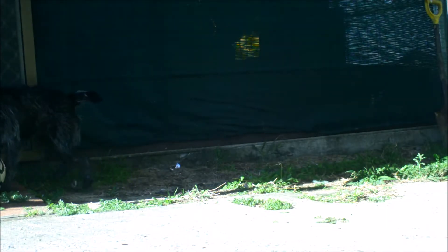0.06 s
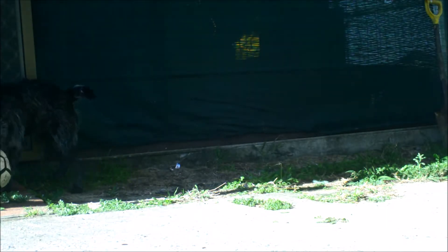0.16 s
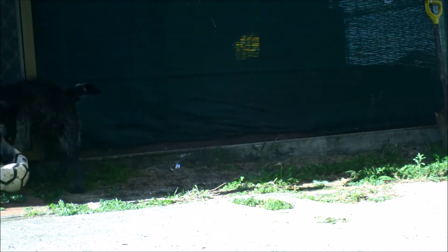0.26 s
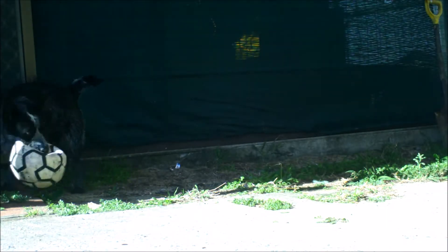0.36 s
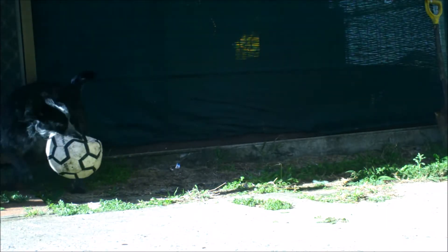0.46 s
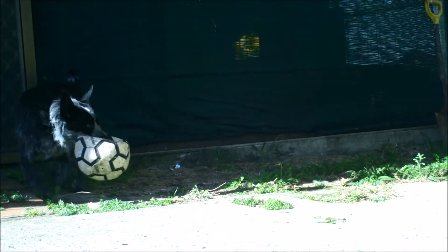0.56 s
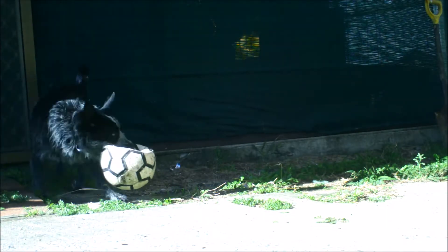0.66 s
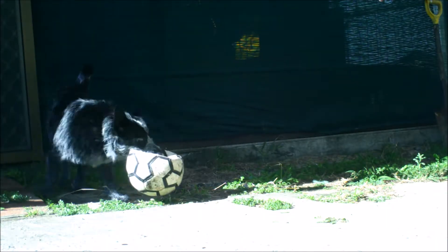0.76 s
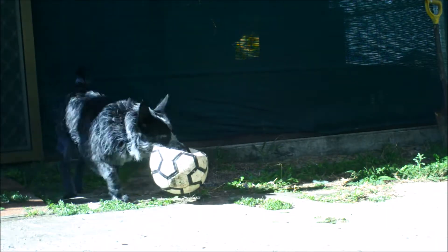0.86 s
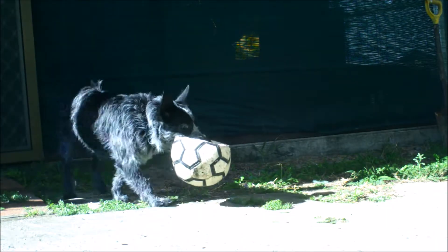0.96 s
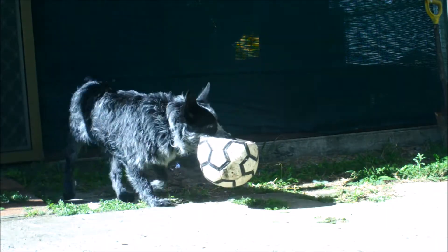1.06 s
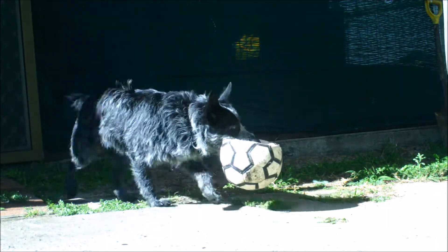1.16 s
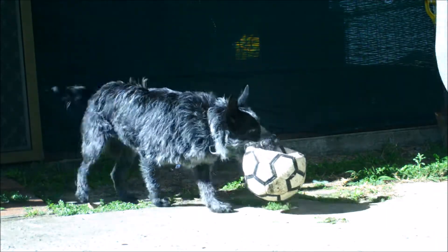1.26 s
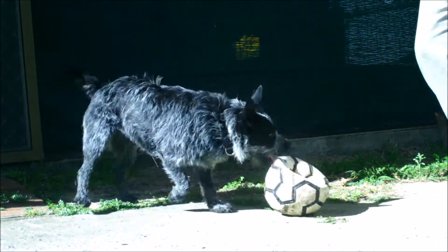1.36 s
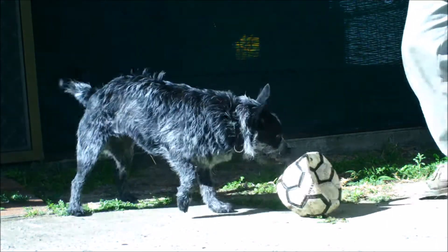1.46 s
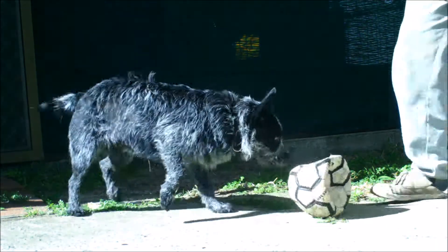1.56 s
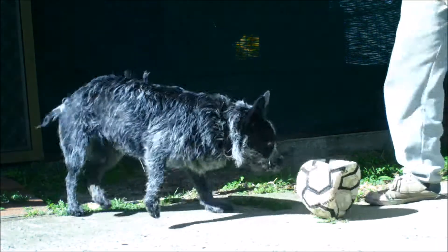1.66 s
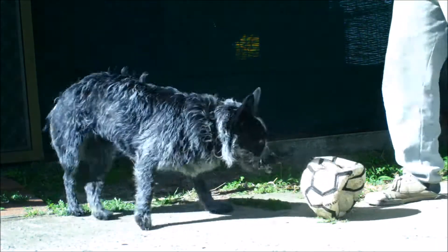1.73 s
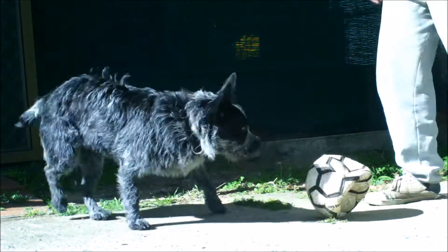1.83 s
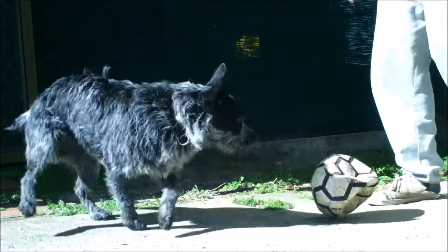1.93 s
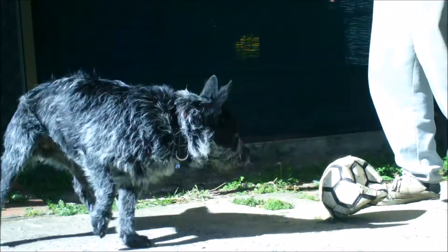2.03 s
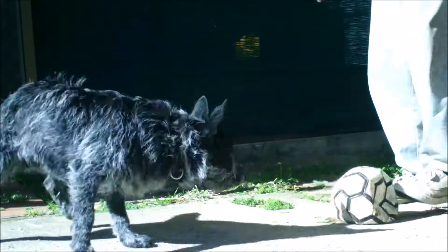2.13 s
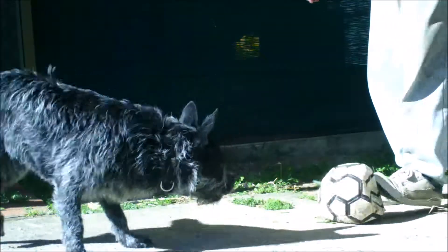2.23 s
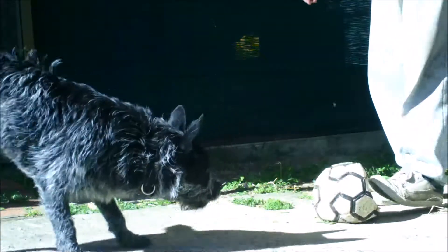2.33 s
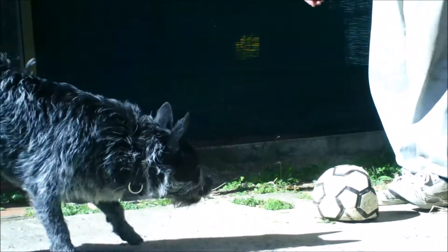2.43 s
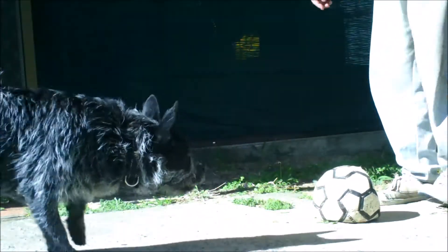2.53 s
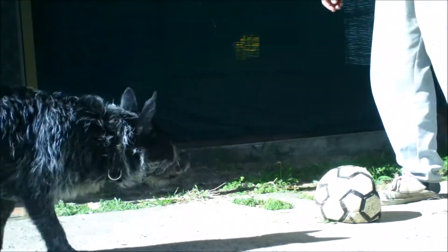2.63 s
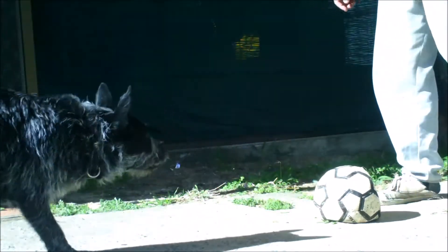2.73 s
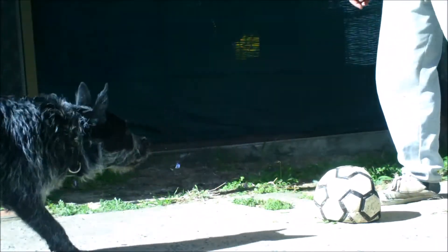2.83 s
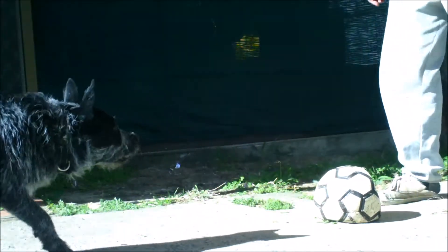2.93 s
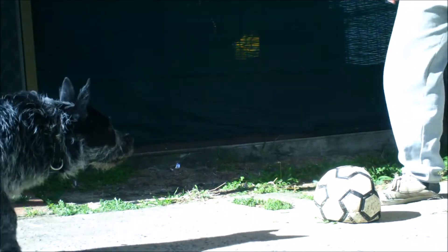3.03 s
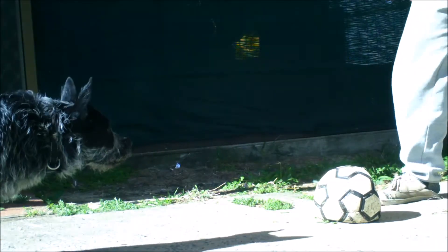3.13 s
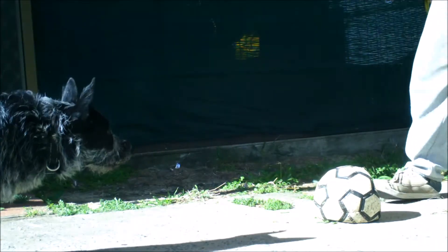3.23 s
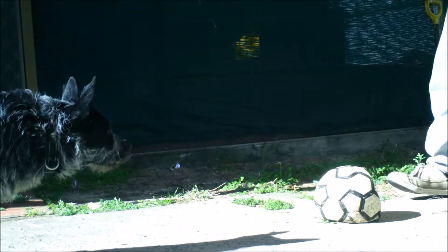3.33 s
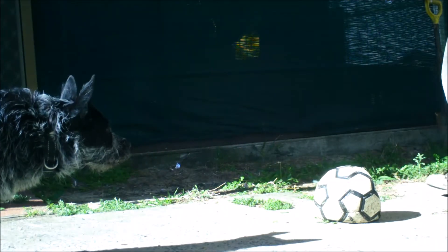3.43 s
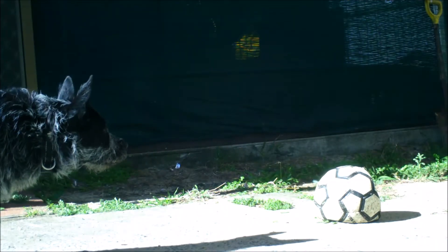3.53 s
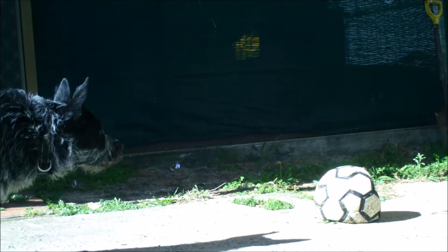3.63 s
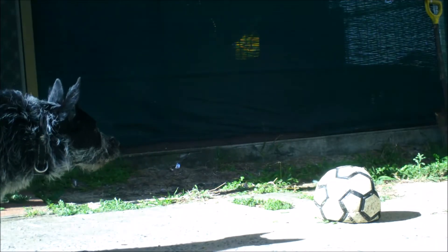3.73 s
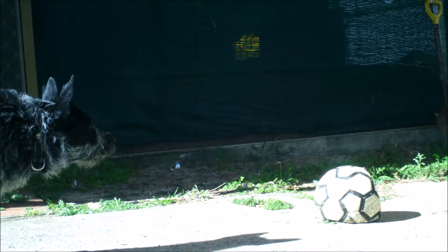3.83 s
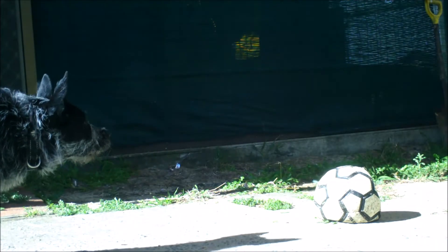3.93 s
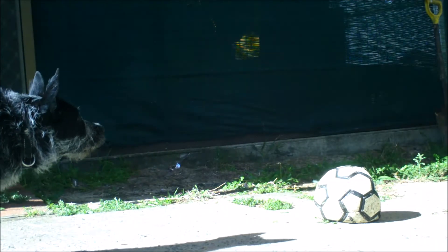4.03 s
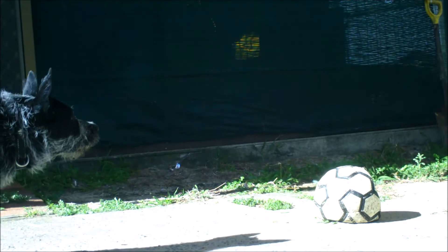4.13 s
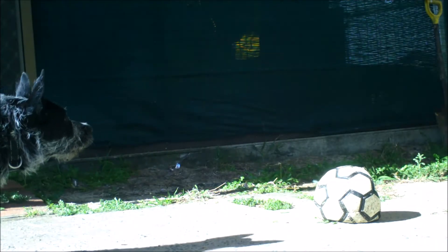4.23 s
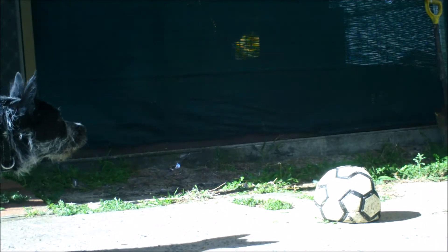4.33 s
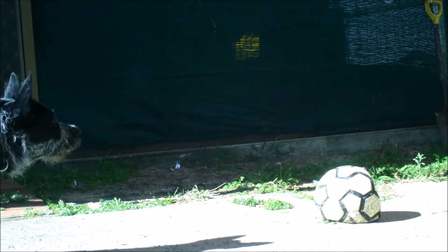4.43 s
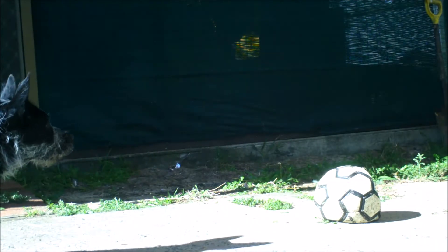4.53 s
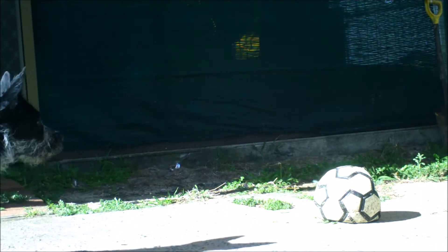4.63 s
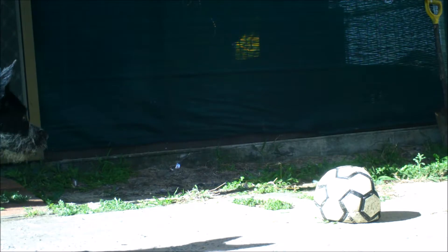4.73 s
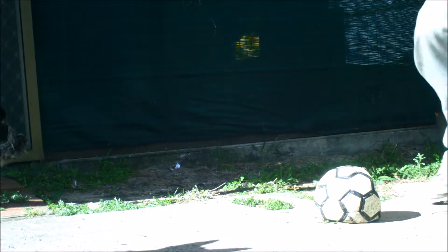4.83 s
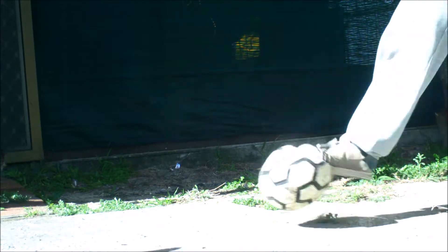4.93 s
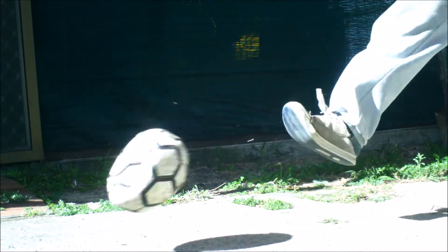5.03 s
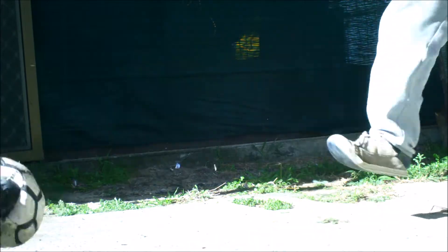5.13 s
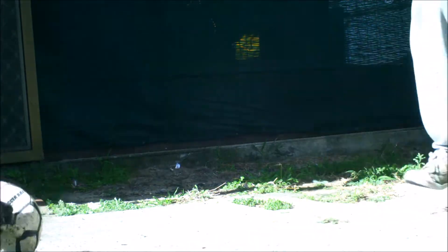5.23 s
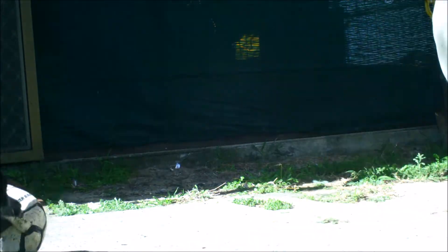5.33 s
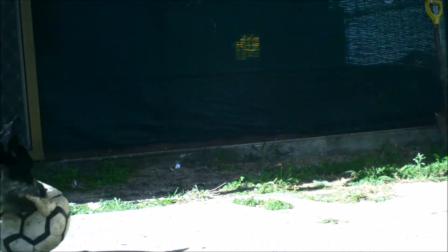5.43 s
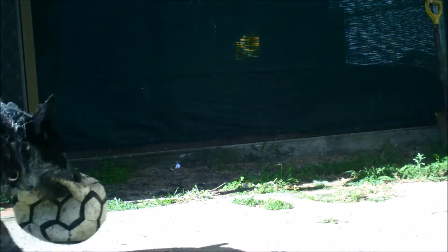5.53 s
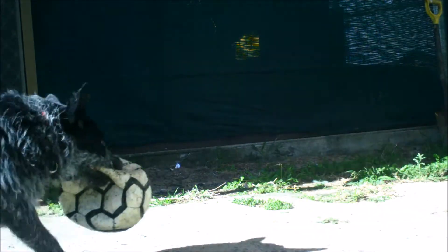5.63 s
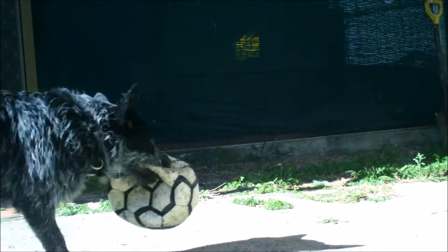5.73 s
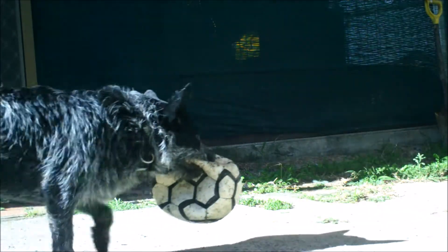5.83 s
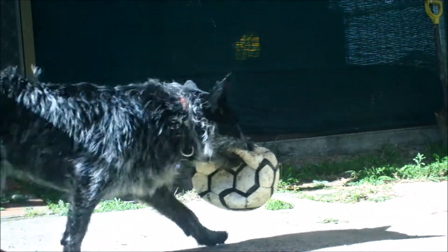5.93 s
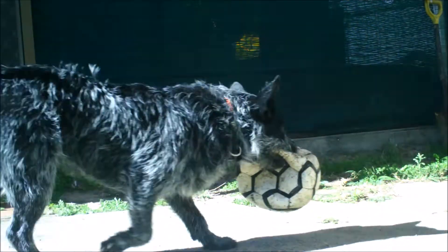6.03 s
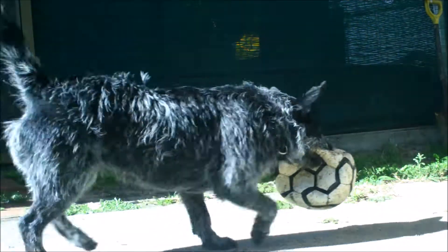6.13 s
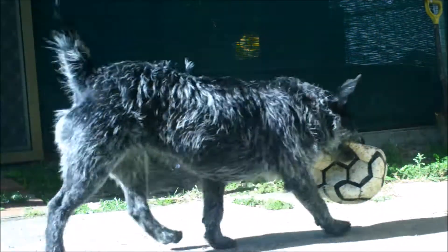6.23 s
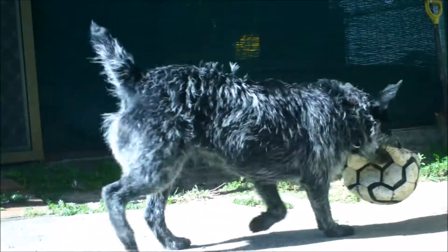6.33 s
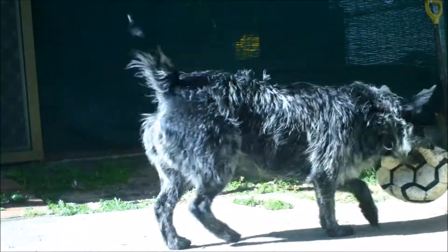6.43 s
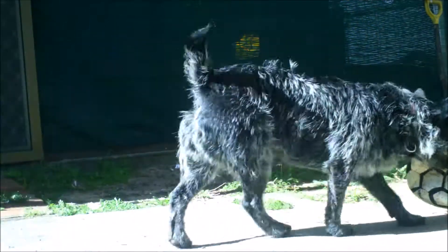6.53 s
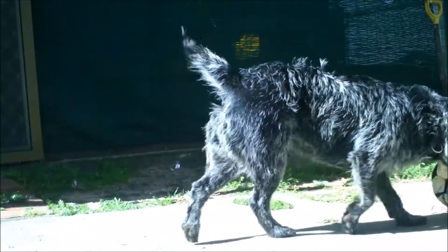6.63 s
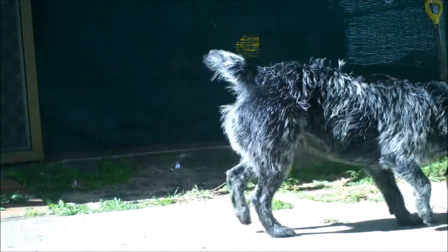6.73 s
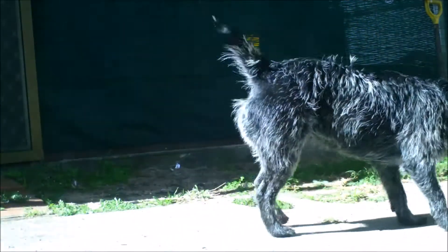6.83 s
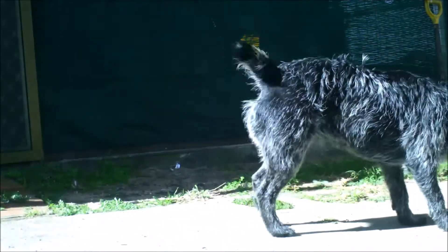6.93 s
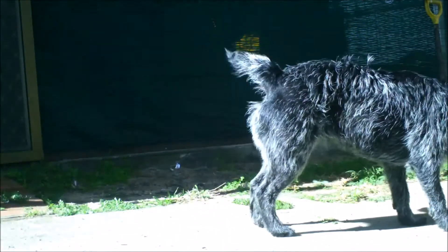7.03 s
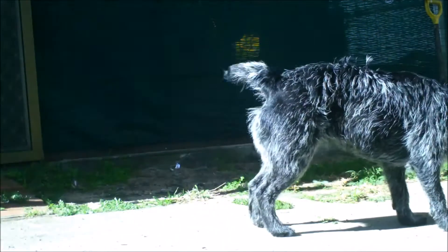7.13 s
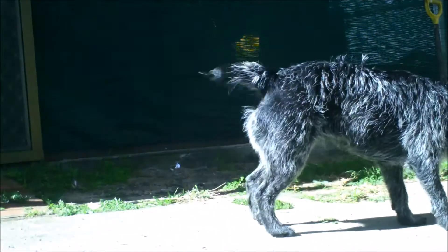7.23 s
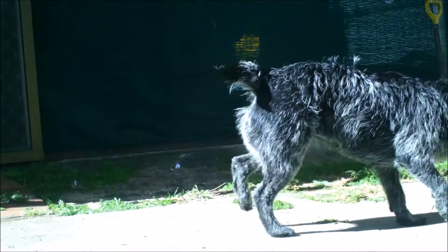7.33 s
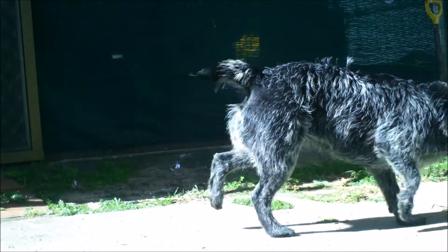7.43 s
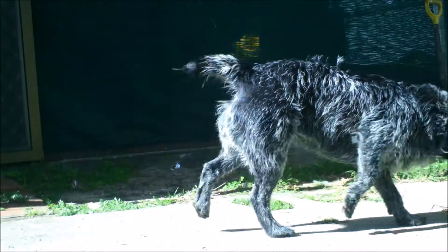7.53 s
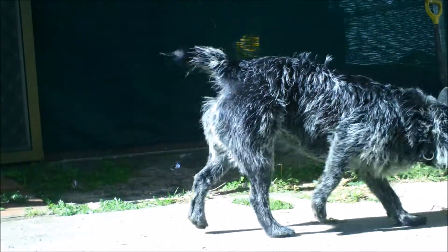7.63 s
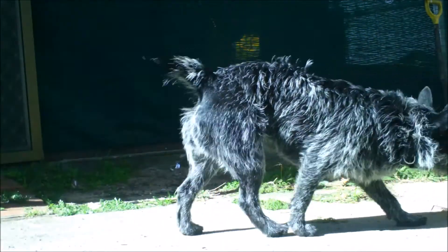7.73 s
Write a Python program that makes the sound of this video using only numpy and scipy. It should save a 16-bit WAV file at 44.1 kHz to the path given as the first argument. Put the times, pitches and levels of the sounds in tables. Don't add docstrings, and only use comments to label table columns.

```python
import sys
import numpy as np
from scipy import signal
from scipy.fft import rfft, irfft, next_fast_len
from scipy.io import wavfile
from scipy.ndimage import uniform_filter1d, map_coordinates

SR = 44100
rng = np.random.default_rng(int(sys.argv[2]) if len(sys.argv) > 2 else 0)


def file_out(sig):
    cols = np.atleast_2d(sig).T
    lim = np.clip(cols, -1, 1)
    pcm = np.round(lim * 32767).astype(np.int16)
    wavfile.write(sys.argv[1], SR, pcm)


def amplitude_ratio(level_db):
    exponent = np.asarray(level_db, float) / 20
    return 10 ** exponent


N = 342902


def unit(x):
    return x / np.sqrt(np.mean(x ** 2) + 1e-20)


def along(points, hz):
    f, v = np.transpose(points)
    return np.interp(np.log(hz + 1), np.log(f + 1), v)


def wobble(rate):
    knots = rng.standard_normal(int(N * rate / SR) + 4)
    return map_coordinates(knots, [np.arange(N) * rate / SR])


def filtered(x, response):
    m = next_fast_len(N + SR // 2)
    return irfft(rfft(x, m) * response(np.fft.rfftfreq(m, 1 / SR)), m)[..., :N]


def coloured(x, spectrum):
    closed = [(spectrum[0][0] / 2, -80), *spectrum, (spectrum[-1][0] * 2, -80)]
    return unit(filtered(x, lambda hz: amplitude_ratio(along(closed, hz))))


def patchy(depth_db):
    z = signal.stft(rng.standard_normal(N), nperseg=256)[2]
    field = uniform_filter1d(rng.standard_normal(z.shape), size=4, axis=0)
    field = uniform_filter1d(field, size=7, axis=1)
    return signal.istft(z * amplitude_ratio(depth_db * unit(field)), nperseg=256)[1][:N]


def during(rows, fade_s):
    s, *cols = np.transpose(rows)
    span = slice(max(round((s[0] - fade_s) * SR), 0), min(round((s[-1] + fade_s) * SR), N))
    t = np.arange(span.start, span.stop) / SR
    gain = np.clip(np.minimum(t - s[0], s[-1] - t) / fade_s + 1, 0, 1)
    return span, gain, [np.interp(t, s, c) for c in cols]


def above(x, edge_hz):
    return signal.sosfilt(signal.butter(3, edge_hz, "high", fs=SR, output="sos"), x)


def sand(lumps_db, grains_db):
    # hz, density_db [dB per Hz]
    body = [(150, -30), (450, -7), (900, 1), (1500, -7.5), (2500, -22.5)]
    grit = [(900, -27.5), (1500, -6), (2500, -0.5), (5000, -8), (7500, -14)]
    sizzle = [(3000, -11.5), (5000, -8), (9000, -11), (15500, -17)]
    slips = lumps_db * wobble(90) + grains_db * wobble(700)
    spiky = [.7, 1.05, 1.15]
    return np.array([coloured(amplitude_ratio(k * slips) * patchy(1.8), c) for k, c in zip(spiky, (body, grit, sizzle))])


def scuffs():
    # time_s, effort_db, lightness [0-1]
    turn = [
        (0, -56.5, 0.6),
        (.126, -40.5, 0.38),
        (.19, -37, 0.74),
        (.21, -32, 0),
        (.32, -39.5, 0.61),
        (.424, -45.5, 1),
    ]
    # time_s, level_db, lightness
    stir = [(.45, -56.5, .6), (.88, -64.5, .05), (1.2, -59.5, 0.39), (1.34, -61.5, 0.026), (1.98, -63, .3),
            (2.04, -68, .05), (2.14, -68, .05), (2.3, -64, .5), (2.6, -66, 0.61), (2.94, -65.5, 0.42),
            (3.9, -62, 0.2), (4.3, -67.5, -0.098), (4.7, -58, 0.5), (5.9, -63.5, 0.031), (7.0, -67, -0.47),
            (7.1, -56.5, 0.39), (7.58, -62.5, -.3), (7.78, -58, 0.22)]
    # peak_s, level_db, lightness, rise_s, fall_s [s per 20 dB]
    drags = [(.92, -50, .1, .12, 0.2), (1.935, -44, 0.21, 0.1, 0.07), (1.87, -46, .3, .05, .1),
             (2.085, -53, .02, .04, .04), (2.295, -42.5, 0.54, 0.21, 0.0854), (3.3, -48, 0.5, .09, 0.1),
             (4.73, -51.5, .05, 0.088, 0.26), (5.6, -54, 0.51, 0.088, .5), (1.53, -52, .4, .12, 0.03),
             (5.42, -63.5, 1.75, .1, .08), (1.9, -57, 0.51, 0.045, 0.02)]
    # time_s, level_db, lightness, fall_s [s per 20 dB]
    skids = [(1.42, -43.5, -0.0023, 0.03), (1.699, -48, 0.15, 0.11), (2.44, -53, 0.52, 0.24),
             (2.98, -57, 0.44, 0.03), (3.77, -44, -.15, 0.12), (4.58, -46, 0.073, 0.1),
             (4.79, -42.5, -.2, 0.06), (4.981, -33.5, -0.09, 0.1), (5.205, -47, 0.39, 0.16),
             (5.31, -45, 0.35, 0.05), (5.519, -43.5, 0.0086, 0.13), (5.81, -63, 0.34, 0.15),
             (7.7, -44.5, 0.2, 0.16)]
    # body_db, sizzle_db
    heavy_db = (0.6, -8)
    light_db = (-13, 3)
    (body_db, sizzle_db), (thin_db, bright_db) = heavy_db, light_db
    skid_rise_s, lightens = .02, 0.41

    def layers(db, light):
        body = body_db + light * (thin_db - body_db)
        sizzle = sizzle_db + light * (bright_db - sizzle_db)
        return amplitude_ratio(db - 3.5 + np.array([body, 0 * light, sizzle]))

    levels, t = np.zeros((3, N)), np.arange(N) / SR
    for rows in (turn, stir):
        span, touch, (db, light) = during(rows, fade_s=0.014)
        levels[:, span] += touch * layers(db, light)
    slides = [(s, db, light, skid_rise_s, fall_s) for s, db, light, fall_s in skids]
    for s, db, light, rise_s, fall_s in drags + slides:
        span = slice(max(round((s - 2 * rise_s) * SR), 0), round((s + 2 * fall_s) * SR))
        off = np.maximum((s - t[span]) / rise_s, (t[span] - s) / fall_s)
        levels[:, span] += layers(db - 20 * off, light + lightens * off)
    return (levels * sand(lumps_db=2.1, grains_db=2.3)).sum(0)


def blows():
    # start_s, grit_db, body_db, t60_s
    sandy = [(0.5765, -43.5, -5, 0.16), (1.1526, -25.5, -14, 0.035), (2.429, -43.5, 0, 0.082),
             (2.469, -39, -11, 0.12), (2.719, -43, -23, 0.13), (5.136, -24, 1, 0.1),
             (5.15, -23.5, -1, 0.18), (5.1874, -27.5, 1, 0.076), (5.8072, -36.5, -20, .08),
             (5.8265, -38, -9, .08), (6.058, -31.5, -11, 0.061), (6.339, -35.5, -6.5, .09),
             (6.6793, -36, -15, .045), (7.066, -31, -5.5, 0.12), (7.0844, -33, -8, .039)]
    gritty = [(0.031, -32, -7.5, 0.096), (0.226, -21, -5, .15), (.95, -36, 6.5, 0.047),
              (1.356, -21.5, -8.5, .19), (1.378, -25.5, -5, .1), (1.6096, -28.5, -1.5, .14),
              (1.6302, -23.5, -4, 0.12), (1.6415, -26.5, 3, .11), (2.5535, -38, -22, 0.066),
              (2.9636, -47, 5.5, 0.057), (2.986, -37, -11, .11), (3.241, -37, -6, .04),
              (3.271, -33, -21, 0.11), (3.3284, -35, -8, 0.05), (4.5338, -33, -6, .1),
              (4.547, -27, -6.5, 0.14), (4.9266, -17, -13, 0.12), (5.04, -36, -11, .08),
              (5.2756, -20, -5, 0.088), (6.4155, -36.5, -10, 0.089)]
    dusty = [(0.106, -31, -5, 0.16), (0.253, -19.5, -11, .068), (.8854, -42, 0, .14),
             (1.3427, -35, -4, .08), (3.7058, -27, -2.5, 0.14), (3.7194, -21, -11, 0.1),
             (4.559, -30.5, -4, .08), (4.9177, -17.5, -4, 0.072), (4.944, -19, -5, .11),
             (5.2924, -14.5, 0.4, .06), (5.3294, -26.5, -10, .087), (5.365, -27.5, -15, .08),
             (5.5544, -27, -21, .1), (7.6799, -40, -2, 0.05)]
    bare = [
        (2.156, -40.5, 3, 0.049),
        (2.172, -23, -2.5, 0.053),
        (3.7636, -34, -10, .069),
        (4.072, -36.5, -8, 0.14),
        (4.7716, -30.5, -2.5, .06),
        (5.5004, -25, -3, 0.03),
        (5.51, -35, -7, .12),
        (7.2336, -47, -14, 0.09),
        (7.2446, -36, -9.5, .09),
    ]
    fizz = (3, -4, -9, -24)
    power, t = np.zeros((3, N + SR)), np.arange(SR // 5) / SR
    lasting = np.array([[1.15], [1.01], [.75]])
    rise_s = np.array([[.0017], [.0017], [.0028]])
    surfaces = zip((sandy, gritty, dusty, bare), fizz)
    contacts = [(*row, fizz_db) for rows, fizz_db in surfaces for row in rows]
    for s, db, body_db, t60, sizzle_db in contacts:
        level_db = db - 9 + np.array([[body_db], [0], [sizzle_db]])
        shape = amplitude_ratio(level_db - 60 * t / (max(t60, .004) * lasting)) * (1 - np.exp(-t / rise_s))
        power[:, round(s * SR):][:, :len(t)] += shape ** 2
    return (np.sqrt(power[:, :N]) * sand(lumps_db=0.8, grains_db=1.9)).sum(0)


def ticks(rows, t60, gain_db, size):
    out, t = np.zeros(N + SR), np.arange(SR // 60) / SR
    cracks = uniform_filter1d(rng.standard_normal((len(rows), len(t))), size=size, axis=1)
    for (s, db, hz), crack in zip(rows, cracks):
        decay = amplitude_ratio(db + gain_db - 60 * t / t60)
        out[round(s * SR):][:len(t)] += decay * (1 + 1.8 * crack) * np.sin(2 * np.pi * hz * t)
    return out[:N]


def claws_and_grit():
    # start_s, peak_db, ring_hz
    claws = [(0.227, -31, 2900), (0.2526, -25, 1510), (0.951, -29.5, 2000), (1.153, -25.5, 1640),
             (1.1636, -38, 1980), (1.3562, -20.5, 3440), (1.6095, -23, 1980), (2.1722, -18.5, 1890),
             (2.2496, -31, 5600), (3.2405, -31, 1880), (3.253, -28.5, 1910), (3.2715, -35, 2630),
             (3.2878, -27, 1900), (3.3505, -26, 2080), (3.707, -37, 2850), (4.5471, -24, 1940),
             (4.5664, -21, 1990), (4.9168, -6.5, 1910), (4.9302, -11, 3450), (5.1352, -19, 1530),
             (5.277, -25, 2980), (5.2925, -11, 1530), (5.5010, -30, 1960), (5.736, -32, 2380),
             (6.059, -37, 4200), (6.4228, -36, 4200), (7.0658, -32, 4100), (7.0747, -27, 4030),
             (7.6796, -28, 2060)]
    pebbles = [(0.175, -24, 5000), (0.363, -25, 4650), (0.4154, -21.5, 4860), (1.1528, -16.5, 5300),
               (1.7823, -36, 6800), (2.43, -29, 8220), (2.4734, -35, 4700), (2.591, -32.5, 6000),
               (2.7177, -28.5, 5500), (2.7364, -30, 9000), (2.8658, -33.5, 6000), (3.3315, -29, 4690),
               (4.5338, -26, 4030), (5.8155, -27.5, 5500), (5.8304, -30, 5110), (5.909, -36, 7040),
               (6.3354, -42.5, 5700), (6.412, -33, 4230), (6.6776, -33, 7010), (7.407, -34, 5750),
               (7.418, -36, 4920), (7.44, -36, 4800)]
    grains = [(0.0329, -36, 3620), (0.1913, -28, 5070), (0.3934, -33, 4800), (0.408, -33, 5420),
              (0.5785, -43, 6040), (0.59, -43, 4490), (0.978, -40, 1950), (1.0127, -44, 2840),
              (1.0339, -44, 5890), (1.4404, -37, 1780), (1.5067, -42, 4170), (1.5468, -44, 2540),
              (1.5938, -45, 4220), (1.6946, -38, 2050), (1.8947, -36, 2010), (1.915, -35, 5680),
              (1.9939, -44, 6160), (2.181, -32, 2690), (2.2384, -37, 3470), (2.4346, -43, 7410),
              (2.4618, -41, 4310), (2.4857, -39, 4480), (2.5152, -47, 5220), (2.6352, -49, 4250),
              (2.7089, -46, 5510), (2.7258, -41, 4880), (2.7495, -45, 3920), (2.9934, -41, 6270),
              (3.3627, -41, 3000), (3.7527, -31, 2260), (3.7677, -33, 2240), (4.56, -30, 2200),
              (4.5736, -33, 1960), (4.591, -35, 1990), (4.6095, -36, 1920), (4.6204, -41, 3100),
              (4.7279, -40, 1990), (4.7741, -38, 2060), (4.8986, -44, 8790), (5.0479, -30, 2980),
              (5.3293, -30, 5530), (5.3398, -31, 1830), (5.5096, -34, 2260), (5.5378, -34, 3140),
              (5.5439, -31, 2080), (5.5551, -30, 3030), (5.6267, -37, 2930), (5.6548, -41, 2050),
              (5.6886, -43, 4110), (5.6966, -43, 5110), (5.7474, -42, 2210), (5.8729, -46, 4910),
              (6.0651, -35, 4240), (6.3442, -38, 9000), (6.6923, -43, 5310), (7.245, -39, 2160),
              (7.4372, -46, 4920), (7.5958, -48, 2390), (7.6193, -47, 2920), (7.6652, -46, 2000)]
    specks = [(3.7075, -34, 8800), (5.137, -27, 6200), (5.246, -36, 12500), (5.253, -40, 9500),
              (5.2755, -31, 13000), (5.392, -39, 12000), (5.414, -41, 11000), (7.322, -42, 5600),
              (7.33, -41, 5400), (7.468, -44, 7300), (7.607, -44, 7000)]
    clicks = ticks(claws, t60=0.0097, gain_db=-5, size=9)
    clicks = clicks + ticks(pebbles, t60=0.0052, gain_db=-7.0, size=3)
    clicks = above(clicks + ticks(grains, t60=.006, gain_db=-1.2, size=7), edge_hz=650)
    return clicks + ticks(specks, t60=.012, gain_db=-3.5, size=3)


def rings(rows, rough, rise_s, gain_db):
    out, t = np.zeros(N + SR), np.arange(SR // 5) / SR
    rub = uniform_filter1d(rng.standard_normal((len(rows), len(t))), size=60, axis=1).cumsum(1)
    for (s, db, hz, t60), drift in zip(rows, rub):
        note = np.sin(2 * np.pi * hz * t + rough * drift) * (1 - np.exp(-t / rise_s))
        out[round(s * SR):][:len(t)] += amplitude_ratio(db + gain_db - 60 * t / max(t60, .005)) * note
    return out[:N]


def ball():
    # pitch_hz, level_db, t60_s
    modes = [(403, -1, 0.17), (752, -2.5, 0.085), (1060, -16, 0.22), (1120, -11, 1.3), (1184, -5, 0.35),
             (1426, -6, 0.14), (1604, -20, 0.33), (2136, -10, 0.12), (2544, -8, 0.082)]
    # start_s, level_db
    bounces = [
        (4.9171, -25),
        (4.9287, -21.5),
        (5.136, -29.5),
        (5.152, -33.5),
    ]
    out, t = np.zeros(N + SR), np.arange(SR // 3) / SR
    for s, db in bounces:
        for hz, level, t60 in modes:
            decay = amplitude_ratio(level + rng.normal(0, 3) - 60 * t / min(t60, .08))
            out[round(s * SR):][:len(t)] -= amplitude_ratio(db) * decay * np.sin(2 * np.pi * hz * t)
    return out[:N]


def weight():
    # start_s, peak_db, pitch_hz, t60_s
    thuds = [
        (0.219, -34, 416, 0.11),
        (1.373, -35.5, 402, 0.084),
        (1.638, -43, 450, 0.1),
        (2.155, -45, 418, 0.1),
        (2.298, -50.5, 381, 0.091),
        (3.712, -41, 438, 0.1),
        (4.917, -31, 432, 0.074),
        (4.927, -29, 355, 0.1),
        (5.138, -25, 411, 0.083),
    ]
    # start_s, peak_db, pitch_hz, t60_s
    bumps = [
        (1.374, -57, 117, 0.13),
        (2.155, -45, 167, 0.07),
        (2.189, -49, 125, 0.12),
        (2.429, -41, 160, 0.05),
        (4.919, -38, 173, 0.12),
        (5.143, -32, 150, 0.089),
        (5.191, -43, 224, 0.13),
    ]
    return above(ball() + rings(thuds + bumps, rough=0.103, rise_s=0.0022, gain_db=-1.5), edge_hz=105)


def hollow_notes():
    # start_s, peak_db, ring_hz, t60_s
    touched = [(0.098, -30, 874, 0.06), (1.153, -26, 1544, 0.03), (1.611, -28, 1940, 0.064),
               (1.627, -23.5, 1870, 0.07), (2.172, -28.5, 2055, 0.061), (2.964, -39, 820, 0.07),
               (3.271, -31, 2560, 0.043), (3.712, -30, 2144, 0.1), (3.723, -29.5, 940, 0.065),
               (4.076, -40, 1976, 0.07), (4.772, -28.5, 960, 0.04), (4.781, -28, 880, 0.04),
               (5.292, -15, 1555, 0.029), (5.51, -27.5, 905, 0.072), (5.736, -40, 2370, 0.07),
               (7.244, -32.5, 2097, 0.045), (4.92, -21, 1089, .12)]
    return above(rings(touched, rough=.16, rise_s=.0006, gain_db=-5), edge_hz=650)


def skin_rattle():
    # start_s, peak_db, ring_hz, t60_s
    creases = [(0.108, -27, 900, .08), (0.113, -31, 2150, .06), (.205, -29, 800, .04),
               (.222, -29, 820, .04), (4.788, -28, 760, .04), (4.9165, -15, 1900, .035),
               (4.919, -14, 1090, .035), (4.918, -19, 2600, .04), (4.926, -18, 420, .06),
               (4.927, -21, 745, .04), (4.932, -15, 1110, .04), (4.941, -16, 830, .04),
               (4.948, -18, 1130, .06), (4.975, -27, 1100, .08), (4.955, -29, 400, .1),
               (3.74, -36, 2250, .2), (5.5, -33, 3100, .05), (5.536, -35, 3100, .1), (5.535, -32, 939, .05),
               (5.19, -29, 1000, .06), (7.244, -41, 3000, .05), (7.244, -42, 4050, .05),
               (7.25, -42, 1000, .06), (1.85, -42, 900, .15), (1.385, -32, 950, .06),
               (5.293, -20, 820, .04), (5.046, -28, 3050, .03), (.226, -27, 5800, .02),
               (7.68, -38, 1500, .04), (3.328, -39, 950, .05)]
    # start_s, peak_db, ring_hz
    knocks = [(0.1806, -38, 720), (0.2371, -27, 780), (0.3703, -45, 930), (1.3066, -53, 1270),
              (1.7499, -43, 750), (1.8769, -42, 860), (2.0613, -54, 860), (2.1571, -46, 870),
              (2.8898, -51, 890), (3.4928, -53, 1030), (4.3714, -53, 610), (4.4302, -51, 820),
              (4.6065, -43, 1030), (4.706, -48, 850), (5.0647, -42, 950), (5.1406, -25, 1460),
              (5.1534, -23, 740), (5.5686, -42, 1250), (5.7351, -46, 1270), (6.2146, -52, 1080),
              (6.5544, -54, 1120), (6.7859, -51, 1320), (6.8954, -50, 680), (7.2732, -48, 1130),
              (7.6051, -49, 750), (7.6802, -41, 890), (7.6979, -43, 850)]
    rattle = rings(creases, rough=.07, rise_s=.0015, gain_db=-1.5)
    return rattle + rings([(*row, .035) for row in knocks], rough=.12, rise_s=.002, gain_db=1.5)


def wall(x):
    # hz, t60_s
    decay = [(200, 0.24), (2000, .2), (10000, 0.13)]
    hz, t, z = signal.stft(rng.standard_normal(SR // 2), SR, nperseg=256)
    tail = signal.istft(z * amplitude_ratio(-60 * t / along(decay, hz)[:, None]), SR, nperseg=256)[1]
    late = np.pad(x, (450, 0))
    return signal.fftconvolve(late, tail / np.linalg.norm(tail))[:N]


def traffic():
    # time_s, level_db
    swell = [
        (0.0, -53),
        (0.26, -51.5),
        (0.41, -60),
        (4.53, -58.5),
        (5.07, -54),
        (6.48, -59),
        (7.78, -56),
    ]
    # hz, density_db [dB per Hz]
    spectrum = [(15, -77), (25, -4), (75, -13.5), (311, -7.5), (450, -6.5), (493, -4.5), (540, -7),
                (634, -3.5), (711, -5.5), (1100, -4.5), (6000, -21.5), (7800, -42), (13200, -120)]
    # time_s, pitch_hz, level_db
    motors = [
        [(1.4, 79, -82), (1.7, 93, -82), (2.45, 62, -72.5), (3.7, 95, -74.5), (4.6, 81, -89)],
        [(5.6, 635, -67), (6.45, 641, -65)],
        [(6.8, 675, -64), (7.3, 684, -71)],
        [(5.85, 148.4, -73), (6.05, 147, -74)],
        [(6.9, 154.2, -74), (7.05, 158, -75)],
        [(7.35, 162, -78), (7.78, 157, -66)],
    ]
    level_db = np.interp(np.arange(N) / SR, *np.transpose(swell)) + .6 * wobble(3)
    road = amplitude_ratio(level_db) * coloured(patchy(1.3), spectrum)
    drift_hz, swell_db = 3 * wobble(12), 2.1 * wobble(3.9)
    for rows in motors:
        span, heard, (hz, db) = during(rows, fade_s=.08)
        phase = 2 * np.pi * np.cumsum(hz + drift_hz[span]) / SR
        road[span] += heard * amplitude_ratio(db + swell_db[span]) * np.sin(phase)
    return road


def scene():
    dog = scuffs() + blows() + hollow_notes() + weight()
    yard = dog + amplitude_ratio(-7.5) * wall(dog) + traffic()
    clicks, rattle = claws_and_grit(), skin_rattle()
    return (yard + clicks + rattle + wall(amplitude_ratio(-13) * clicks + amplitude_ratio(-9) * rattle))[None]


def thinned(x, coarse_db, follow):
    thin = [20, 47, 69, 71, 80, 89, 107, 109, 117, 141, 148, 160, 193, 204, 210, 217, 220, 224, 226, 236,
            264, 292, 304, 318, 320, 322, 339, 343, 354]
    dulled = [47, 80, 339]
    frame_s = 1024 / 48000
    hop = round(frame_s * SR)
    n, k = np.arange(2 * hop) + .5, np.arange(hop) + .5
    window = np.sqrt(2 / hop) * np.sin(np.pi * n / (2 * hop))
    basis = window * np.cos(np.pi / hop * np.outer(k, n + hop / 2))
    middle = np.round((np.array(thin) + .475) * frame_s * SR).astype(int)
    at = middle[:, None] - hop + np.arange(2 * hop)
    lines = x[at] @ basis.T
    near = np.sqrt(np.abs(uniform_filter1d(lines ** 2, size=40, axis=1)))
    step = amplitude_ratio(coarse_db) * near ** follow * near.mean(1, keepdims=True) ** (1 - follow)
    step[np.isin(thin, dulled)] *= np.where(k * SR / (2 * hop) > 6800, 4, 1)
    error = (step * np.round(lines / step) - lines) @ basis
    return x + np.bincount(at.ravel(), error.ravel(), len(x))


def band_limit(x):
    return signal.sosfilt(signal.butter(12, 16660, fs=SR, output="sos"), x)


def record(dry):
    # pitch_hz, level_db
    scan = [(15734.3, -70), (15674.4, -75), (15614.4, -81), (15750, -75)]
    # time_s, level_db
    breeze = [
        (.5, -64),
        (4.8, -68.5),
        (5.15, -54.5),
        (5.5, -66),
    ]
    # hz, density_db [dB per Hz]
    hiss = [(2500, -16), (4000, 7.5), (9000, 8), (15000, 5.5)]
    # start_s, end_s
    mute = (4.9068, 4.9123)
    top_hz = 15840
    t = np.arange(N) / SR
    whistle = sum(amplitude_ratio(db) * np.sin(2 * np.pi * hz * t) for hz, db in scan)
    hiss_db = np.interp(t, *np.transpose(breeze)) + 1.5 + .6 * wobble(2)
    x = dry[0] + amplitude_ratio(hiss_db) * coloured(patchy(0.33), hiss)

    def microphone(hz):
        notch = 1 - .93 * np.exp(-((hz - 7865) / 140) ** 2)
        low_cut = hz ** 2 / (hz ** 2 + 70 ** 2)
        return low_cut * amplitude_ratio(-np.clip(hz - top_hz, 0, 200) / 2) * notch

    x = filtered(x, microphone) + whistle
    x = thinned(x, coarse_db=13.5, follow=.7)
    gate = np.clip(np.maximum(mute[0] - t, t - mute[1]) / .001, 0, 1) * (t < 7.776)
    return band_limit((x * gate)[None])


dry = scene()
out = record(dry)
file_out(out)
```